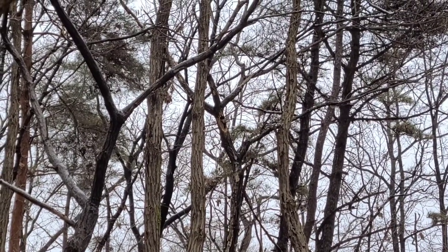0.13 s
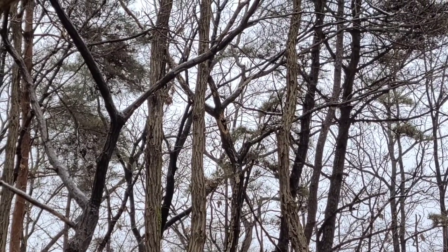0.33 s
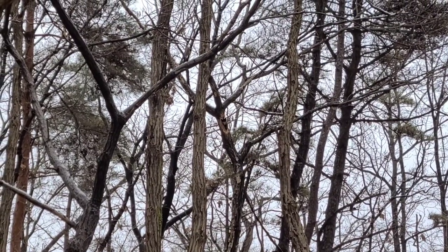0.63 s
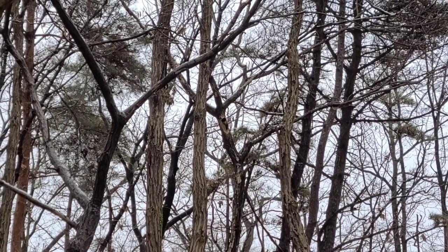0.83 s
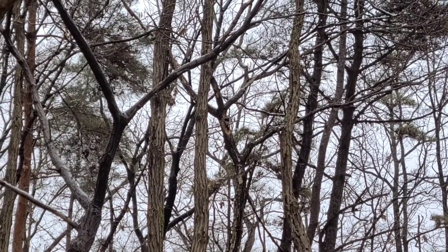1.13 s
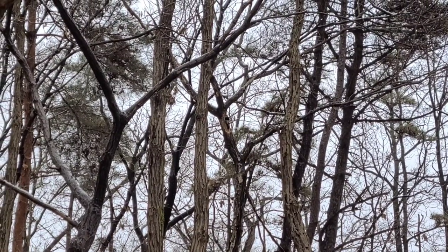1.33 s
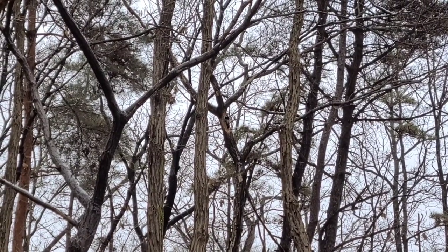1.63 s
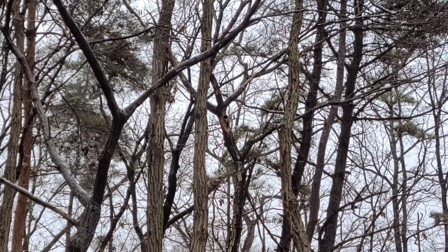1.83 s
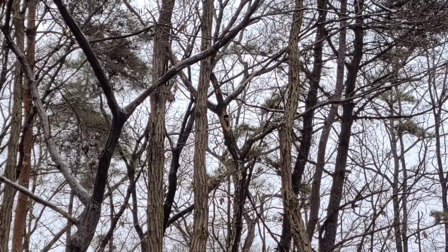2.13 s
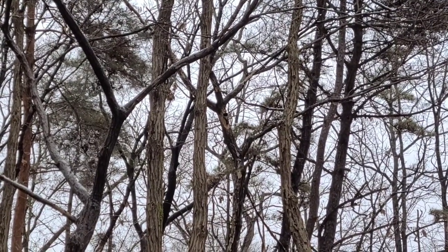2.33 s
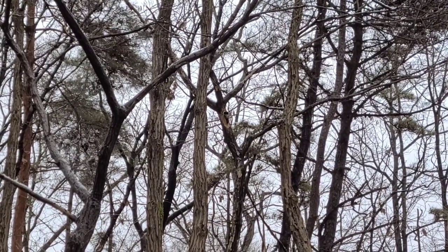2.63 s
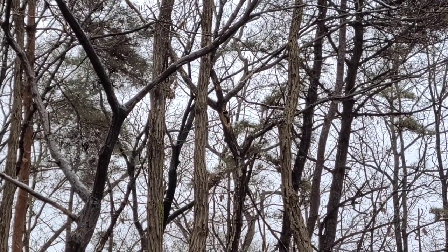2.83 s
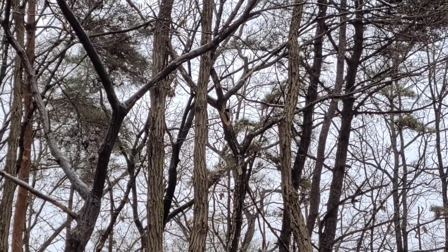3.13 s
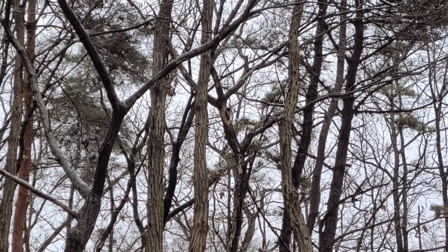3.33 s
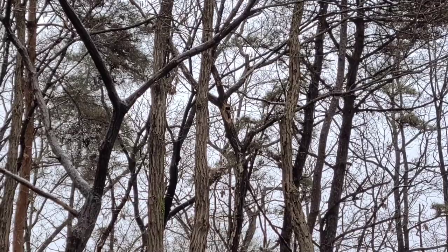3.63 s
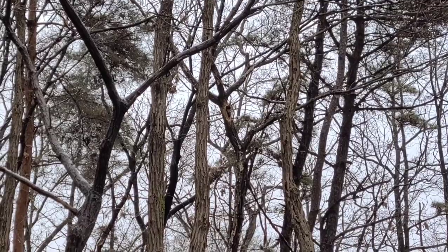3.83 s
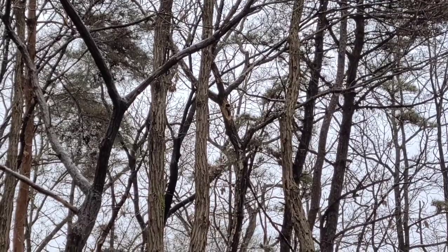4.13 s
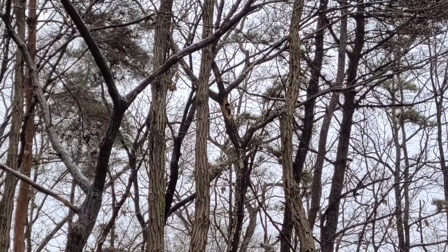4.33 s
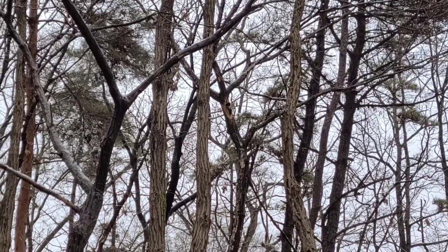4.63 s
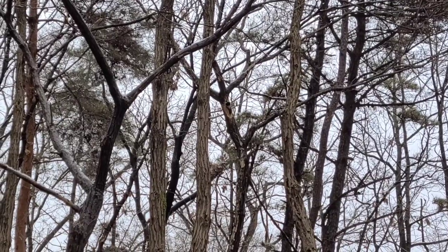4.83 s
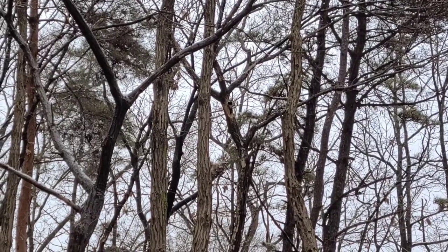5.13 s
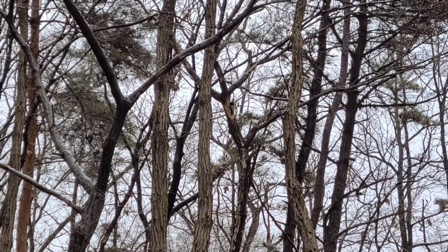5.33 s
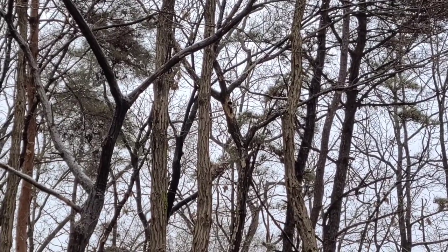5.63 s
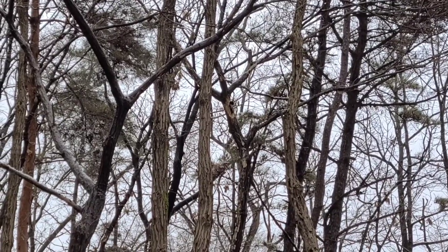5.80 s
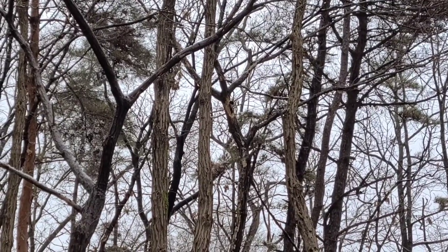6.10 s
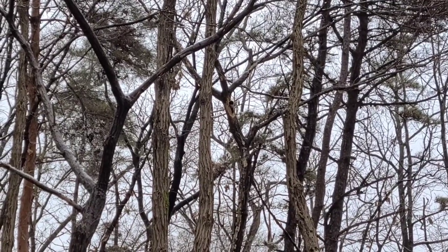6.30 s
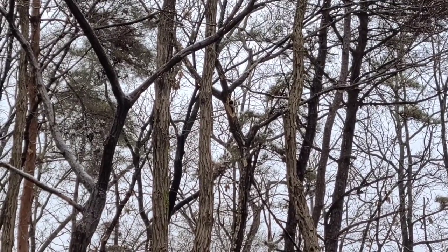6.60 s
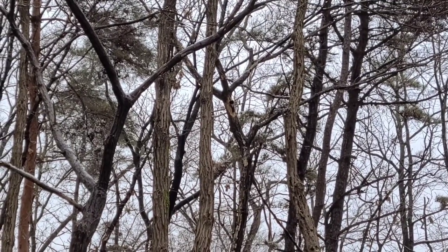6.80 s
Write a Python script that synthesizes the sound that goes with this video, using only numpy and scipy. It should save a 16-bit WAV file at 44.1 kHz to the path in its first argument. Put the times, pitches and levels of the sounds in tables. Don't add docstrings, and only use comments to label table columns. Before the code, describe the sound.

Crisp, sparse bill taps over low distant wind and faint hiss, a hoarse falling bird call, thin rising calls, and a rumbling gust on the right.

```python
import sys
import numpy as np
from scipy import signal
from scipy.fft import rfft, irfft, next_fast_len
from scipy.io import wavfile
from scipy.ndimage import uniform_filter1d, map_coordinates

SR = 44100
rng = np.random.default_rng(int(sys.argv[2]) if len(sys.argv) > 2 else 0)


def pcm_store(signal):
    levels = np.round(np.clip(np.atleast_2d(signal), -1, 1) * 32767)
    wavfile.write(sys.argv[1], SR, levels.astype(np.int16).T)


def to_linear_factor(level_db):
    exponent = np.asarray(level_db, float) / 20
    return 10 ** exponent


N = 306936

# t/s, level of air striking the ports/dB, swell of the far drone/dB
WIND_COURSE = [(0.0, -75, 0.5), (1.36, -67.5, 0.5), (1.72, -61, 0), (2.02, -61, 1), (2.27, -75, -1.25),
               (3.31, -58, 0.4), (3.76, -69, -0.5), (4.25, -60, .4), (4.71, -65.5, 0), (5.08, -55, -0.5),
               (5.41, -51, -0.8), (5.6, -54.5, -0.3), (5.97, -61, -1.2), (6.24, -48, -1.3),
               (6.43, -38.5, 1.2), (6.73, -54.5, -0.3), (6.96, -43, -1.1)]


def unit(x):
    return x / np.sqrt(np.mean(x ** 2) + 1e-20)


def along(points, hz):
    f, v = np.transpose(points)
    return np.interp(np.log(hz + 1), np.log(f + 1), v)


def wobble(rate, size=N):
    knots = rng.standard_normal(int(size * rate / SR) + 4)
    return map_coordinates(knots, [np.arange(size) * rate / SR])


def wind_curve(column):
    course = np.transpose(WIND_COURSE)
    return np.interp(np.arange(N) / SR, course[0], course[column])


def filtered(x, response):
    m = next_fast_len(x.shape[-1] + 4096)
    return irfft(rfft(x, m) * response(np.fft.rfftfreq(m, 1 / SR)), m)[..., :x.shape[-1]]


def modes(resonances):
    def response(f):
        return sum((-1) ** k * to_linear_factor(db) * 1j * f * w / (c * c - f * f + 1j * f * w)
                   for k, (c, w, db) in enumerate(resonances))
    return response


def late_left(hz, lag=17 / 44100):
    return np.exp(-2j * np.pi * hz * lag * np.array([[1], [0]]))


def add(mix, sound, s):
    part = mix[:, round(s * SR):][:, :sound.shape[1]]
    part += sound[:, :part.shape[1]]


def forest(x, gap, stretch, size):
    # f/Hz, t60/s
    tree_decay = [(1000, 0.98), (3000, 0.67), (4400, 0.6), (7000, 0.2), (12000, 0.37)]
    hz, t, z = signal.stft(rng.standard_normal((2, size)), SR, nperseg=128)
    lumps = to_linear_factor(3.5 * rng.standard_normal(len(t)))
    decay = to_linear_factor(-60 * t / (stretch * along(tree_decay, hz)[:, None]))
    tail = signal.istft(z * lumps * decay, SR, nperseg=128)[1]
    tail = np.pad(tail / np.linalg.norm(tail[0]), ((0, 0), (int(gap * SR), 0)))
    return signal.fftconvolve(x[None], tail, axes=1)


def far_drone():
    # f/Hz, level/dB per Hz
    drone_spectrum = [(15, -23), (25, -7.5), (50, 0), (110, -6.5), (195, -4.5), (260, -6.5), (374, -9.5),
                      (609, -14.5), (730, -14), (907, -20.5), (1760, -31.5), (2110, -39), (3000, -40),
                      (5000, -59.5), (6500, -60)]
    # f/Hz, correlation
    port_likeness = [(60, 0.92), (140, 1), (300, 0.9), (600, 0.78), (1200, 0.36), (2000, 0.023),
                     (3500, 0.065)]

    def mid_side_colour(hz):
        turn = np.arccos(np.clip(along(port_likeness, hz), -1, 1)) / 2
        return to_linear_factor(along(drone_spectrum, hz)) * [np.cos(turn), np.sin(turn)]

    mid, side = filtered(rng.standard_normal((2, N)), mid_side_colour)
    drone = unit(filtered(np.array([mid + side, mid - side]), late_left))
    balance = to_linear_factor([[-.4], [.4]])
    wander_db = .5 * wobble(5.6) + .4 * wobble(11)
    return to_linear_factor(-51 + wind_curve(2) + wander_db) * drone * balance


def buffeting():
    # f/Hz, level/dB per Hz
    buffet_spectrum = [(8.8, -27.5), (15, -16), (38, 15.5), (130, -5.5), (170, -52), (290, -120)]
    lumps = to_linear_factor(1.7 * np.array([wobble(14), wobble(5)]))
    rumble = filtered(rng.standard_normal((2, N)), lambda hz: to_linear_factor(along(buffet_spectrum, hz)))
    return to_linear_factor(wind_curve(1) + 2) * unit(lumps * rumble)


def capsule_hiss():
    # f/Hz, level/dB per Hz
    left_hiss = [(1500, -22), (3500, 2), (5500, -2.5), (7300, -1), (8000, 7), (8700, -2), (9400, 3.5),
                 (10500, -3), (16000, -0.5)]
    right_hiss = [(1500, -43), (3500, 3), (5500, -1), (7000, -5), (9500, -7), (11000, -2.5), (12000, -1),
                  (13500, -5), (16000, -4.5)]
    colour = lambda hz: to_linear_factor([along(left_hiss, hz), along(right_hiss, hz)])
    return to_linear_factor(-75.5) * unit(filtered(rng.standard_normal((2, N)), colour))


def contacts():
    # t/s, peak level/dB, loudest bark resonance f/Hz, trunk knock/dB, splinters/dB
    pecks = [(0.318, -37.5, 5940, -8.5, -13), (0.362, -46, 6360, -31, -6), (0.5874, -38.5, 5660, -3.5, -14),
             (0.634, -41.5, 8050, -19, -9), (0.8549, -31.5, 8400, -21, -6), (0.8939, -53, 8200, -16, -1),
             (1.2853, -51.5, 5960, -2.5, 0), (1.5732, -55, 7230, -24, -6), (2.017, -44.5, 4840, -8, -8),
             (2.3953, -51, 6200, -1.5, -11), (2.7692, -47, 6200, -5.5, 2.5), (2.9619, -52.5, 6300, 1, -1),
             (3.509, -61, 10100, -2, 1), (3.626, -66, 11200, -31, 1), (3.894, -51, 6570, -2, -6),
             (4.106, -51, 5400, 3, -4), (4.11, -47.5, 5300, -27, -5), (4.7252, -52.5, 6100, 3, -11),
             (5.3755, -50.5, 9000, -2, -2), (5.5678, -62, 7800, 6, 1), (5.7632, -55, 8100, 6, -12),
             (6.21, -66, 4300, 10, -12)]
    # t/s, peak level/dB, splinters/dB
    skids = [(0.3501, -54, -12), (0.364, -54, -3), (0.3828, -62, -4), (0.606, -57, -12), (0.6247, -51, -14),
             (0.6363, -44, -8), (0.656, -59, 4), (0.857, -50, -4), (0.8651, -64, -8), (0.8917, -59, -8),
             (0.8958, -59, 3), (1.289, -49, -1.5), (2.0202, -59, -5), (2.771, -49, 2), (2.964, -51, -3),
             (5.672, -58, -6), (6.134, -62, -4), (6.583, -61, -5)]
    touches = []
    for s, db, hz, knock_db, splinter_db in pecks:
        length_ms = max(0.96 + .035 * (-38 - db), .3)
        touches.append((s, db, hz, length_ms, knock_db, splinter_db))
    for s, db, splinter_db in skids:
        spot_hz = [peck[2] for peck in pecks if peck[0] < s][-1]
        touches.append((s, db, spot_hz, .7, -18, splinter_db))
    return touches


def strike(db, hz, ms, knock_db, splinter_db):
    # f/Hz, width/Hz, level/dB
    bark_modes = [(4000, 1300, -10.5), (6100, 1300, -4.5), (8500, 1600, -3.5)]
    splinter_modes = [(8930, 780, -1), (11840, 6300, -6.2), (14700, 1300, -5)]
    trunk_modes = [(744, 120, 8.5), (1310, 580, 1.5), (2006, 48, 4.5), (3250, 1800, -15.5)]
    peak = lambda x: x / abs(x).max()
    t = np.arange(1200) / SR
    u = t / (0.00083 * ms)
    crackle = (u * np.exp(1 - u)) ** 3 * rng.standard_normal((3, len(t)))
    crackle[:, round(.0007 * ms * SR)] += 2.2
    spot_modes = sorted([m for m in bark_modes if abs(m[0] - hz) > 1300] + [(hz, 900, 0)])
    bark = peak(filtered(crackle[0], lambda f: modes(spot_modes)(f) ** 2))
    splinters = peak(filtered(crackle[1], lambda f: modes(splinter_modes)(f) ** 2))
    tick = to_linear_factor(db) * (bark + to_linear_factor(splinter_db) * splinters)
    knock = to_linear_factor(db + knock_db + 0.5) * peak(filtered(crackle[2], modes(trunk_modes)))
    return tick, knock


def woodpecker():
    # f/Hz, level/dB
    left_shadow = [(2000, 9), (5000, -6), (6500, -5), (8500, -33), (12000, -9)]
    mix = np.zeros((2, N))
    for s, db, hz, ms, knock_db, splinter_db in contacts():
        tick, knock = strike(db, hz, ms, knock_db, splinter_db)
        shadowed = filtered(tick, lambda f: to_linear_factor(along(left_shadow, f)))
        add(mix, np.array([shadowed, tick]) + knock, s - 0.0011 * ms)
        add(mix, to_linear_factor(-7.5) * forest(tick + knock, 0.0037, stretch=0.38, size=7000), s)
    return mix


def port_thumps(pushes):
    out, t = np.zeros((1, N)), np.arange(-SR // 10, SR // 10) / SR
    for s, db, hz in pushes:
        width = 0.57 / hz * to_linear_factor(-0.2 * (db + 23.5))
        shape = np.exp(-(t / (width * np.where(t < 0, .6, 1.15))) ** 2)
        glide = 2 * np.pi * hz * (t - 3 * t * abs(t))
        lean = rng.normal(0, .4)
        snap = to_linear_factor(db + 16) * (hz / 80) ** 4 * np.exp(-((t + 0.00082) / 0.0016) ** 2)
        add(out, to_linear_factor(db) * (shape * np.cos(glide + lean) + snap)[None], s + t[0])
    return out[0]


def gust_thumps():
    # t/s, peak level/dB, f/Hz
    left_pushes = [
        (3.303, -38, 56.6),
        (4.96, -38.5, 44),
        (5.208, -39.5, 80),
        (5.542, -35, 53.7),
        (5.647, -32.5, 66.4),
        (5.897, -34, 61),
        (5.953, -32, 65.5),
        (6.247, -26, 61.7),
        (6.496, -49, 77),
        (6.834, -43, 50.6),
    ]
    right_pushes = [(5.528, -36.5, 57.7), (6.238, -22.5, 57.6), (6.291, -27, 53.7), (6.33, -20.5, 82),
                    (6.345, -20.5, 72.5), (6.359, -23.5, 76), (6.404, -21, 93.5), (6.431, -21.5, 52),
                    (6.452, -25.5, 85), (6.502, -22.5, 74.5), (6.547, -27, 49.7), (6.595, -28, 44.3),
                    (6.626, -25.5, 45), (6.788, -35, 48), (6.833, -37.5, 58.7), (6.936, -29, 42.6)]
    thumps = np.array([port_thumps(left_pushes), port_thumps(right_pushes)])
    thumps = filtered(thumps, lambda hz: hz / (hz + 12))
    return thumps + to_linear_factor(-22) * thumps[::-1]


def voice(s, pitch, overtones, hoarse):
    t = np.arange(s[0], s[-1], 1 / SR)
    smooth = lambda v: uniform_filter1d(np.interp(t, s, v), 300, mode="nearest")
    shake = 1 + .01 * hoarse * wobble(300, size=len(t))
    phase = 2 * np.pi * np.cumsum(smooth(pitch) * shake) / SR
    song = np.zeros(len(t))
    for k, db in overtones:
        flutter_db = 1.5 * hoarse * wobble(110, size=len(t))
        song += to_linear_factor(smooth(db) + 5.5 + flutter_db) * np.sin(k * phase)
    return song


def falling_call():
    # t/s, pitch f/Hz, effort level/dB
    fall = [
        (4.72, 1640, -83),
        (4.78, 1684, -82),
        (4.93, 1632, -80.5),
        (5.071, 1586, -78.5),
        (5.18, 1514, -78),
        (5.22, 1455, -75),
        (5.275, 1427, -76),
        (5.295, 1245, -83),
        (5.31, 1250, -100),
    ]
    # f/Hz, level/dB
    throat = [(2500, 3), (2900, 1), (3300, -2.5), (3800, -3), (4400, -2.5), (4900, -2), (5800, -7),
              (6700, -12)]
    s, pitch, effort_db = np.transpose(fall)
    overtones = [(k, effort_db + along(throat, k * pitch)) for k in (2, 3, 4)]
    return s[0], voice(s, pitch, overtones, hoarse=1.6)


def rising_call(start, top_hz, db, length, fade, hoarse):
    start_hz, climb_s, peak_s = 1200, .031, .045
    high_start_hz, high_top_hz, high_climb_s, high_peak_s = 2350, 5710, .02, .028
    t = np.arange(0, length, .002)
    release_db = 25 * np.clip(1 - (length - t) / .03, 0, 1)

    low = top_hz - (top_hz - start_hz) * np.exp(-t / climb_s)
    muffle_db = np.clip(14 * (3500 - low) / 1000, 0, 13)
    low_db = db - muffle_db - fade * np.maximum(t - peak_s, 0) - release_db
    octave_db = low_db - np.interp(low, [2300, 3000], [8, 32])

    high = high_top_hz - (high_top_hz - high_start_hz) * np.exp(-t / high_climb_s)
    onset_db = 8 * np.maximum(1 - t / high_peak_s, 0)
    high_fade_db = (fade + 130) * np.maximum(t - high_peak_s, 0)
    high_db = db - 12.5 - onset_db - high_fade_db - release_db

    low_voice = voice(start + t, low, [(1, low_db), (2, octave_db)], hoarse)
    return low_voice + voice(start + t, high, [(1, high_db)], hoarse + .6)


def bird():
    # t/s, top pitch f/Hz, peak level/dB, length/s, fade after the peak/dB per s
    rises = [
        (5.756, 4400, -64, .235, 100),
        (6.092, 4620, -67.5, .16, 12),
        (6.915, 3800, -65, .15, 10),
    ]
    mix = np.zeros((2, N))
    calls = [(*falling_call(), -3.5)]
    for k, row in enumerate(rises):
        echo_db = -64.5 - row[2]
        calls.append((row[0], rising_call(*row, hoarse=.9 + 1.25 * k), echo_db))
    for s, song, echo_db in calls:
        both = np.pad(song, (0, 64)) * np.ones((2, 1))
        add(mix, filtered(both, lambda hz: late_left(hz, 21.5 / 44100)), s)
        add(mix, to_linear_factor(echo_db) * forest(song, .008, stretch=1.0, size=22000), s)
    return mix


def scene():
    return far_drone() + buffeting() + capsule_hiss() + woodpecker() + gust_thumps() + bird()


def top_cut(x):
    return signal.sosfilt(signal.butter(12, 16580, fs=SR, output="sos"), x)


def record(dry):
    def band_limit(hz):
        rolloff_db = -14 - (hz - 15800) / 120 - 30 * (hz > 16580)
        return np.where(hz < 15800, 1, to_linear_factor(rolloff_db))
    return top_cut(filtered(dry, band_limit))


dry = scene()
out = record(dry)
pcm_store(out)
```